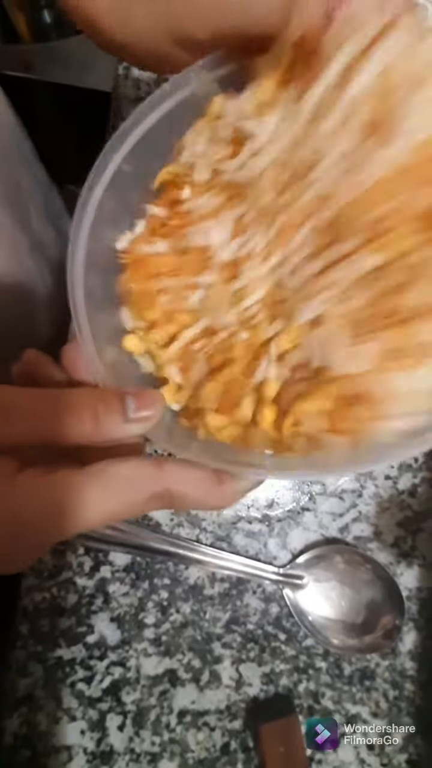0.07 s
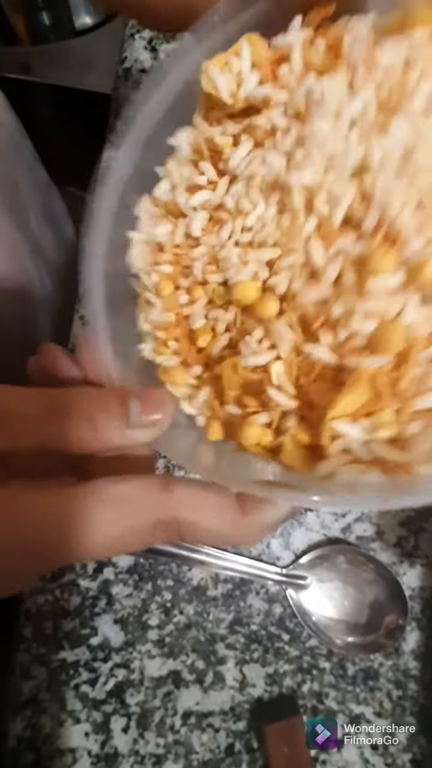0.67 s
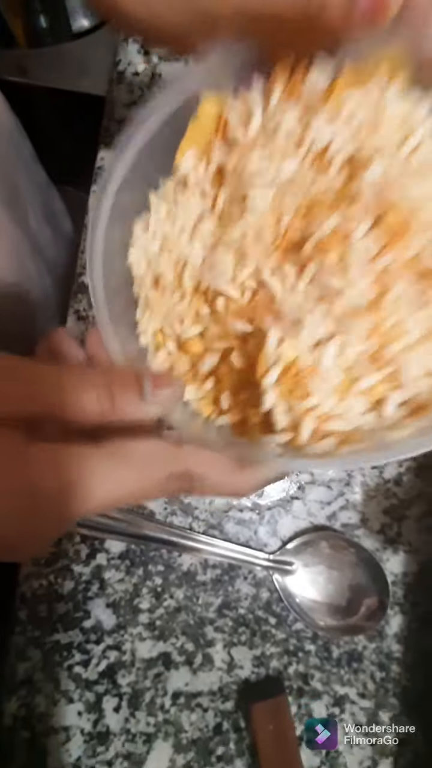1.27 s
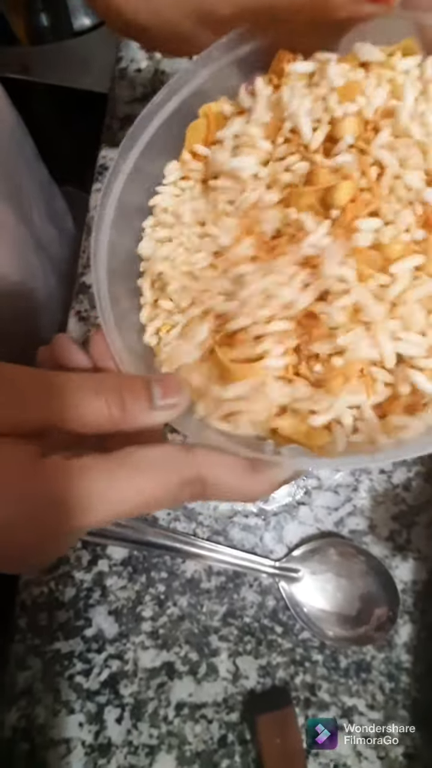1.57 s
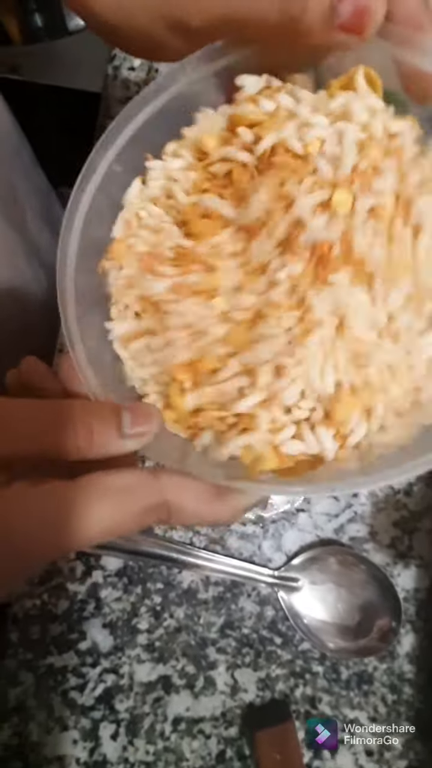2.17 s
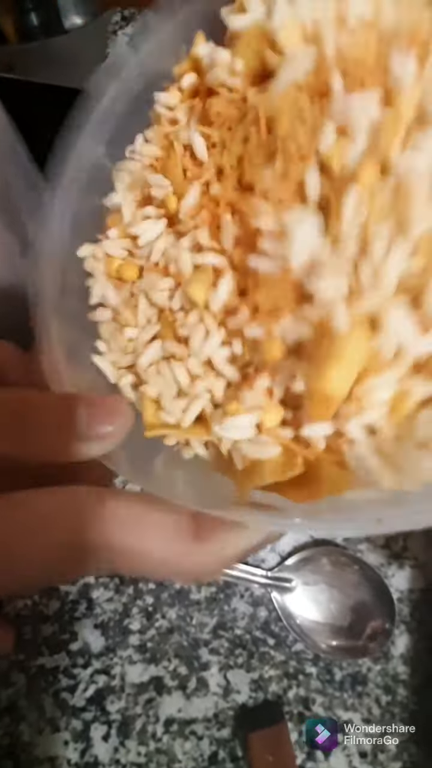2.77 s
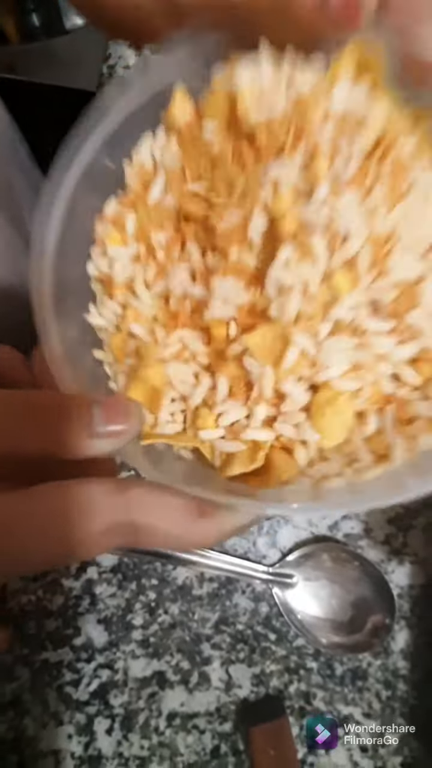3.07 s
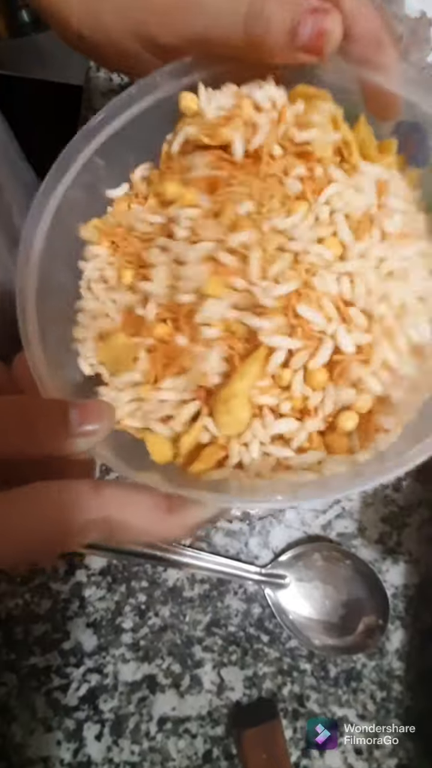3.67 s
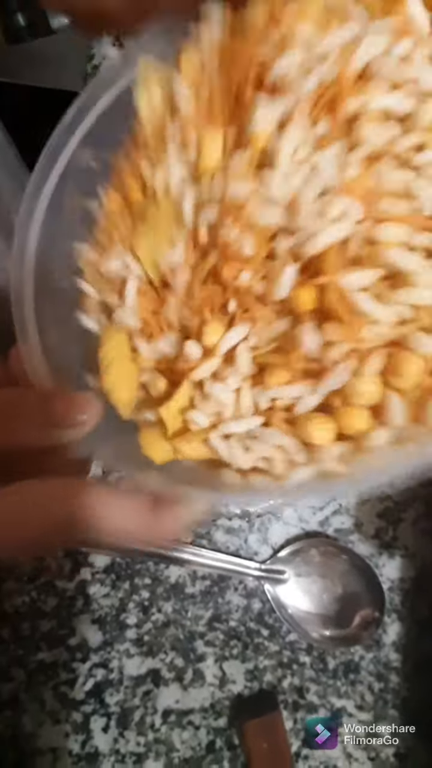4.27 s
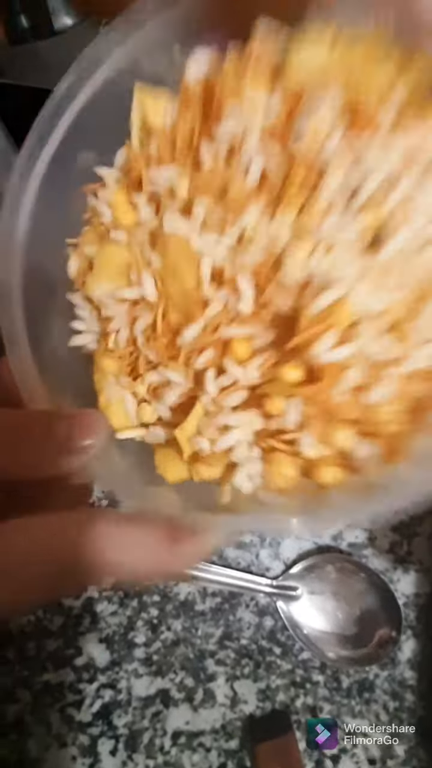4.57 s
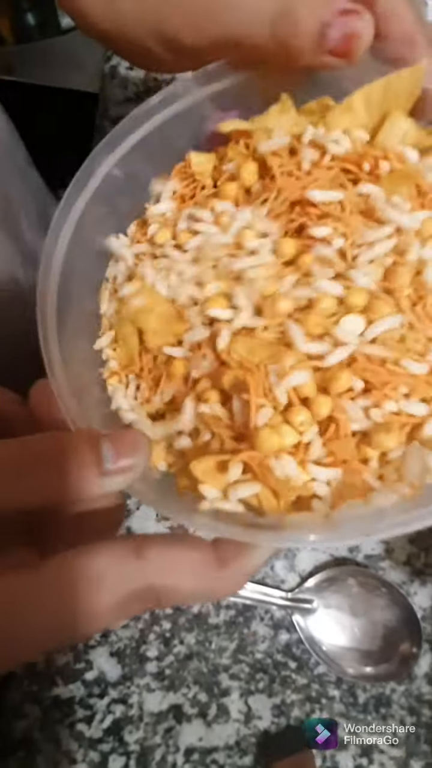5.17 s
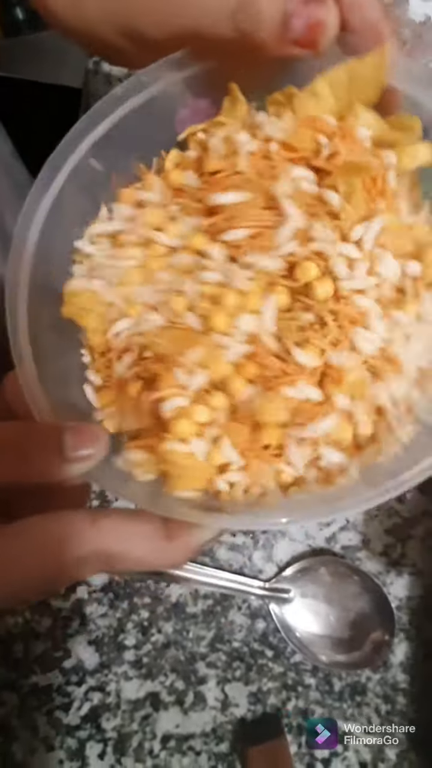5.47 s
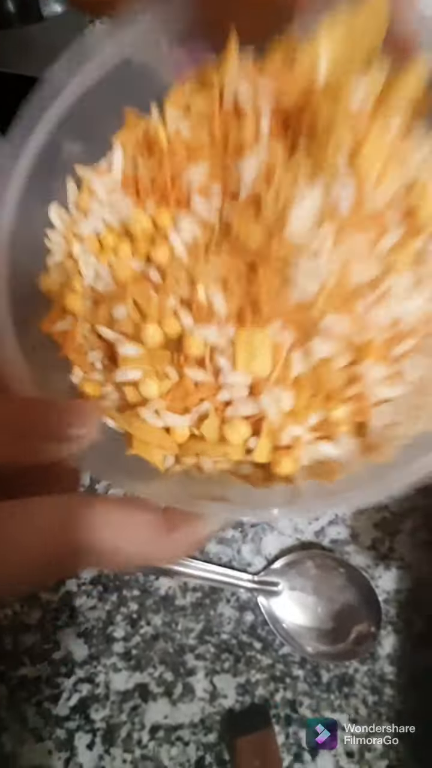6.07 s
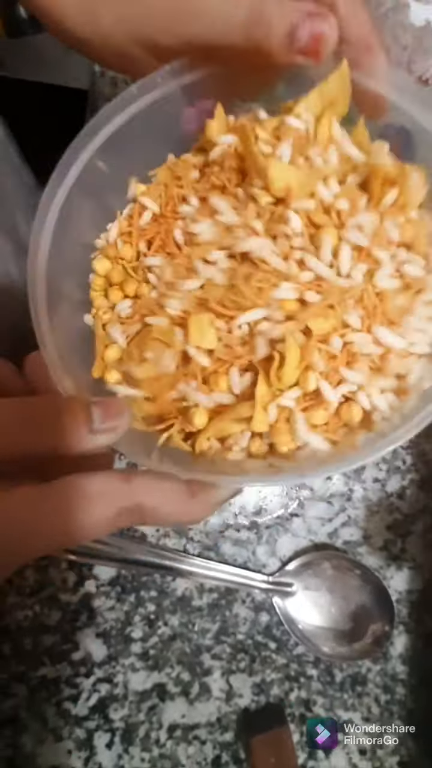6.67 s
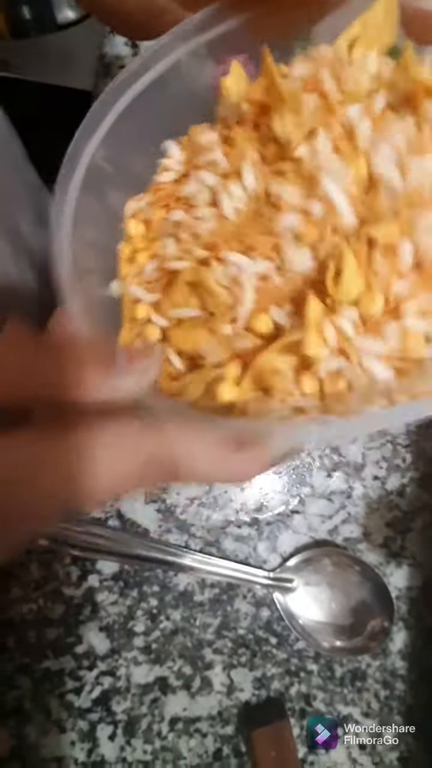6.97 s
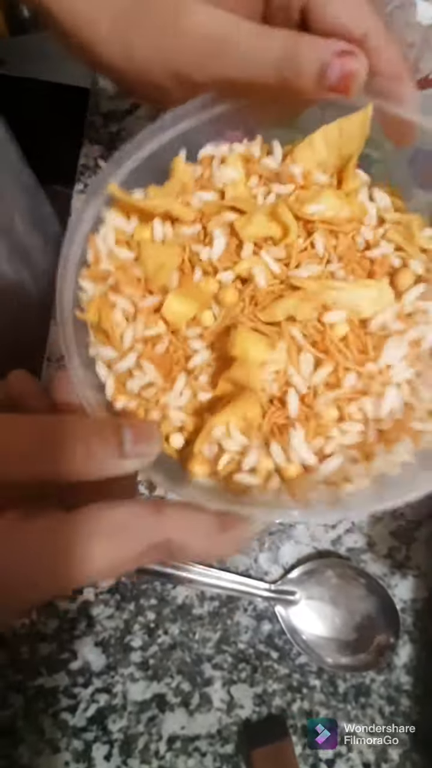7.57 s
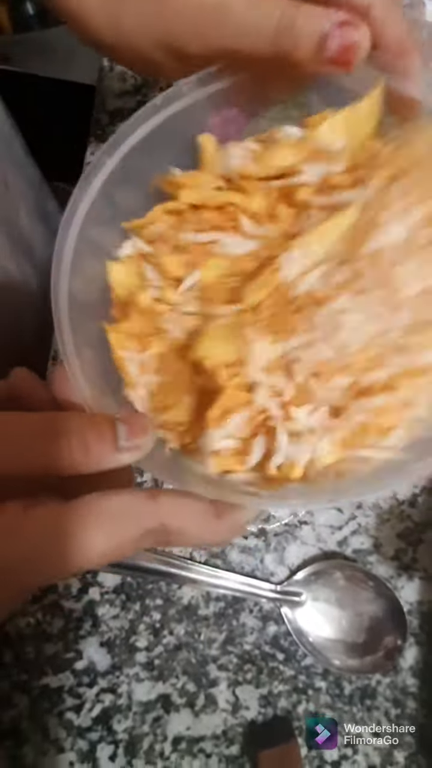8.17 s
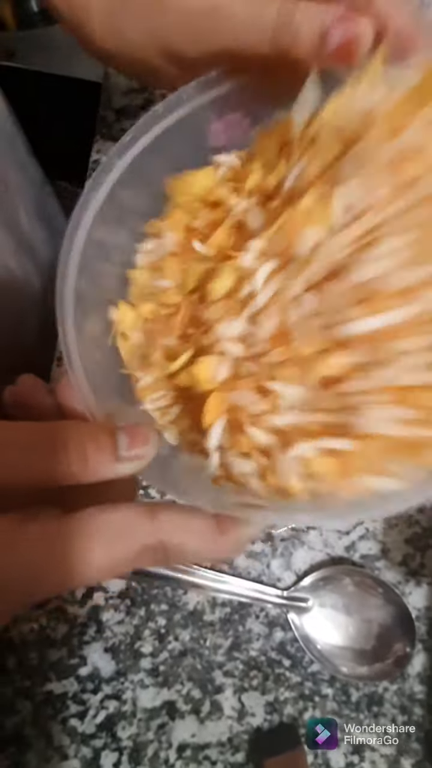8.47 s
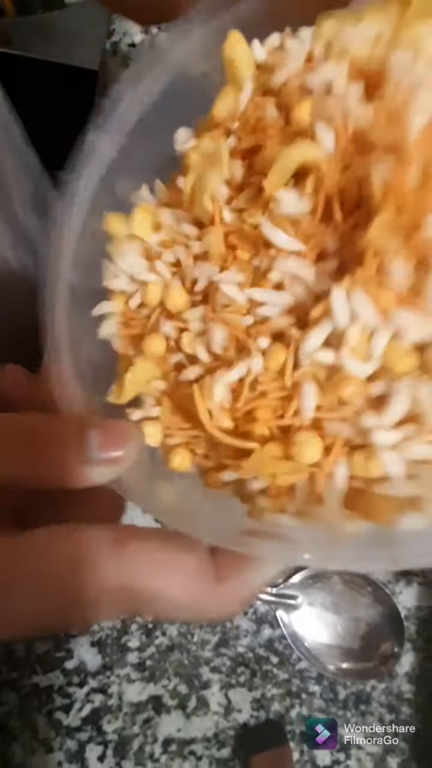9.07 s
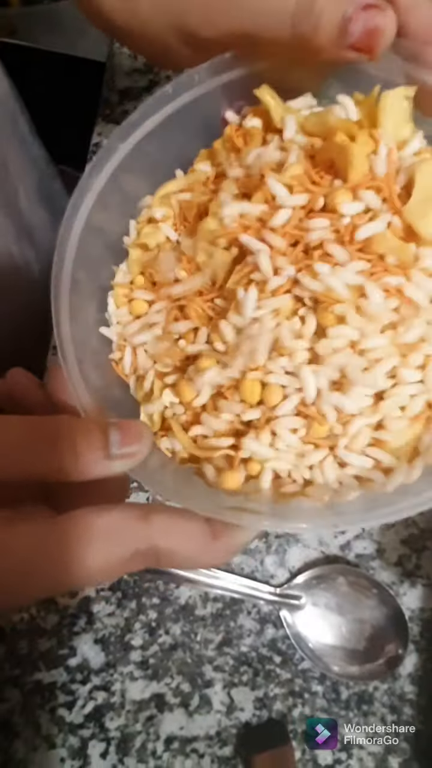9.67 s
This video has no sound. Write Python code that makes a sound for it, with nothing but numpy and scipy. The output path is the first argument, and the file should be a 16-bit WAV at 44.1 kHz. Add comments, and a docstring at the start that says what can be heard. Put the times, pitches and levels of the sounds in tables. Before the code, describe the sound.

From the start, dry puffed rice and crunchy snack bits are tossed in a thin plastic tub close to the microphone, about three times a second. Each load slaps the bottom and patters down in a short, crisp swish, giving the tub a hollow ring that varies in strength. Between tosses the grains slide and settle with a softer rustle, and hard bits tick sharply against the wall. This even rhythm lasts until about 6.7 seconds. From 7 to 7.6 seconds the mix is shaken sideways in quicker strokes, dragging over the bottom with a brighter rattle and a cluster of louder clicks. At about 7.8 seconds the regular tossing resumes, with six more landings, the last near 9.6 seconds. The small kitchen adds only a very short echo, and a faint low hum swells and sinks underneath throughout.

```python
"""Puffed rice and crunchy snack bits are tossed in a thin plastic tub, about three times a second.
Each load slaps the tub's floor, patters down and makes it ring; the grains then slide and settle,
and hard bits tick on the wall. At 7 s the mix is shaken sideways and drags over the floor;
from 7.8 s the tossing resumes. A low hum fills the small kitchen throughout."""
import sys
import numpy as np
from scipy import signal
from scipy.fft import rfft, irfft, next_fast_len
from scipy.io import wavfile

SR = 44100
rng = np.random.default_rng(int(sys.argv[2]) if len(sys.argv) > 2 else 0)


def unload_audio(sound):
    """Save the sound as a 16-bit wav file, at the path given as the first command line argument."""
    columns = np.transpose(np.atleast_2d(sound))
    # keep every value between -1 and 1, then stretch to whole-number steps
    steps = np.round(np.clip(columns, -1, 1) * 32767)
    wavfile.write(sys.argv[1], SR, steps.astype(np.int16))


N = 433062

# Landings; table levels are relative. (slap time [s], slap level [dB], crest time [s], crest level [dB],
# slide lead before crest [s], settling level [dB], boom level [dB], boom pitch [Hz])
LANDINGS = [(.085, -33.5, .158, -26, 0.072, -46.5, -23, 320),
            (.471, -30.5, .509, -25.5, 0.025, -49.5, -46, 272),
            (.812, -29, .845, -25.5, .042, -50.5, -37, 324),
            (1.145, -37, 1.199, -25, 0.041, -50, -30, 324.4), (1.466, -40, 1.523, -26, .04, -49, -32, 324),
            (1.838, -26.5, 1.887, -27.5, 0.057, -58.5, -29.5, 316),
            (2.172, -31.5, 2.215, -24, 0.038, -48, -41, 279),
            (2.556, -26, 2.581, -24, 0.052, -53.5, -38, 320),
            (2.912, -38, 2.957, -25, 0.051, -55.5, -41, 319),
            (3.268, -41, 3.313, -26.5, 0.055, -58, -49, 274),
            (3.663, -27, 3.697, -27, 0.057, -47.5, -40, 322),
            (4.004, -44, 4.048, -25.5, 0.065, -52.5, -28.5, 323),
            (4.362, -42, 4.414, -27.5, 0.071, -49, -35, 332),
            (4.735, -38, 4.790, -28, 0.059, -52.5, -41, 348),
            (5.075, -37, 5.126, -27.5, 0.041, -51, -38, 327),
            (5.439, -38, 5.494, -27.5, 0.05, -43.5, -33.5, 269),
            (5.799, -41, 5.867, -25.5, 0.072, -46, -44, 269),
            (6.246, -33, 6.298, -27.5, 0.041, -59, -39, 274),
            (6.603, -30.5, 6.661, -27.5, 0.055, -51, -40, 312),
            (7.833, -35, 7.890, -25, 0.073, -51, -30.5, 274),
            (8.177, -30, 8.223, -26, 0.054, -46, -30, 300),
            (8.514, -28, 8.554, -27, 0.051, -45.5, -30, 324),
            (8.856, -26, 8.894, -26.5, .05, -45.5, -63, 320),
            (9.205, -23.5, 9.239, -25.5, 0.053, -46, -38, 304),
            (9.563, -45, 9.612, -27, 0.039, -50.5, -28, 328.5)]
# Spectrum of the load hitting the floor: (frequency [Hz], left [dB], right [dB])
IMPACT_SPECTRUM = [(110, -21, -28), (195, -13.5, -23.5), (295, -7.5, -9.5), (438, -12, -21),
                   (657, -4.5, -17), (890, -6.5, -10), (1170, -5.5, -10), (3230, -3.5, -4.5),
                   (4700, -11.5, -13.5), (6800, -12.5, -17), (7980, -26, -16.5), (9140, -28, -28.5),
                   (12000, -22.5, -25.5), (15300, -27.5, -33.5)]
# Spectrum of dry grains rubbing: (frequency [Hz], left [dB], right [dB])
RUSTLE_SPECTRUM = [(200, -14, -18), (400, -14.5, -15.5), (846, -6, -10.5), (1170, -13, -12),
                   (1670, -11, -7.5), (2400, -3.5, -3.5), (3180, 1, -0.5), (4450, -4.5, -7),
                   (6600, -6, -12), (6700, -4.5, -8.5), (8080, -33, -11.5), (9100, -23, -27),
                   (11900, -19, -21.5), (15300, -20.5, -28.5)]
# Tub resonances: (frequency [Hz], width [Hz], level [dB])
TUB_MODES = [(274, 15, 1.5), (324, 13, 7.5), (560, 52, 4), (805, 67, 11), (907, 28, 6), (947, 51, 5),
             (1238, 52, 2.5), (1410, 43, 3.5), (1497, 23, 4), (2200, 110, 1), (3020, 43, -15.5)]


def landings():
    """Each load rains down in a swell of collisions; the floor joins in as the first grains reach it."""
    usual_crest_db, usual_lead_s, fall_db_per_s = -26, 0.053, 315
    floor_force, heap_force, crunch_force = np.zeros((3, N))
    for slap_s, _, crest_s, crest_db, lead_s, *_ in LANDINGS:
        crest = int(crest_s * SR)
        near = np.arange(max(0, crest - SR // 5), min(N, crest + SR // 4))
        t = near / SR
        rise_db_per_s = 392 * (usual_lead_s / lead_s) ** 0.48  # longer slide, slower swell
        slope_db_per_s = np.where(t < crest_s, rise_db_per_s, fall_db_per_s)
        dip_db = np.hypot(slope_db_per_s * (t - crest_s), 3) - 3
        swell = amp(crest_db - dip_db)
        heap_force[near] += swell * amp(np.interp(t, [slap_s - .006, slap_s + .002], [-4, 0]))
        floor_db = np.interp(t, [slap_s - .002, slap_s + .0011, crest_s, crest_s + .052], [-9, 3, 1, -3.5])
        floor_force[near] += swell * amp(floor_db)
        # crunch gathers more tightly around the crest
        crunch_force[near] += amp(-13.5 + 0.75 * (crest_db - usual_crest_db) - 1.26 * dip_db)
    clicks = collisions(9000, spread_db=4.5, scatter_db=-4.5, scatter_t60_s=0.0048)
    patter = coloured(clicks, IMPACT_SPECTRUM, TUB_MODES)
    hollow = filtered(patter, lambda hz: 1 / (1 + (hz / 1100) ** 8))
    crunch = filtered(patter, lambda hz: 1 - 1 / (1 + (hz / 2400) ** 6))
    middle = patter - hollow - crunch
    return amp(11.5) * floor_force * hollow + amp(10) * heap_force * middle + crunch_force * crunch


def knocks():
    """The first clump slaps the floor's modes; the load then booms at a pitch set by grip and filling."""
    t = np.arange(SR // 3) / SR
    early = t[:SR // 12]
    slaps, booms = np.zeros((2, N + len(t)))
    for slap_s, slap_db, crest_s, *_, boom_db, boom_hz in LANDINGS:
        ring = sum(amp(db + 2 * rng.standard_normal()) * np.sin(2 * np.pi * hz * early)
                   for hz, _, db in TUB_MODES[2:9])
        ring *= decay(early, t60_s=0.087) * (1 - np.exp(-early / 0.0014))
        crack = rng.standard_normal(len(early)) * decay(early, t60_s=0.019)
        slaps[round(slap_s * SR):][:len(early)] += amp(slap_db - 8) * (ring + 0.37 * crack)
        # fresh blows keep jolting the boom's phase
        jolts_rad = np.cumsum(rng.standard_normal(len(t))) * np.sqrt(25 / SR)
        push = (1 - np.exp(-(t / 0.019) ** 2)) * decay(t, t60_s=0.31)
        boom = push * np.sin(2 * np.pi * boom_hz * t + jolts_rad)
        booms[round((crest_s - .04) * SR):][:len(t)] += amp(boom_db + 6.5) * boom
    return slaps[:N] * amp([[3], [-4]]) + booms[:N] * amp([[1], [-1]])


def sliding():
    """Faster sliding brings more and brighter collisions; the heap clatters and lone grains bounce off."""
    # Resonances of the stiff wall: (frequency [Hz], width [Hz], level [dB])
    wall_modes = [(324, 29, 10), (783, 40, 3.5), (3033, 185, 3), (3470, 100, -9), (3790, 260, 2.5)]
    # Spectrum of a lone grain's click: (frequency [Hz], left [dB], right [dB])
    stray_spectrum = [(500, -26, -23), (2200, -12, -8), (3200, -4, -3), (6000, 0.5, -8), (8500, -20, -20),
                      (12000, -19, -21)]
    motion_db = heap_motion_db()
    knots = np.arange(N) * 45 / SR  # 45 random levels a second
    clatter_db = 2.1 * np.interp(knots, np.arange(N), rng.standard_normal(N))
    rate_per_s = 3900 * amp(.65 * (motion_db + 38))
    clicks = collisions(rate_per_s, spread_db=4.5, scatter_db=-3, scatter_t60_s=0.012)
    grains = coloured(clicks, RUSTLE_SPECTRUM, wall_modes)
    # slow grains touch softly and lose treble
    treble = filtered(grains, lambda hz: 1 - 1 / (1 + (hz / 6500) ** 4))
    treble_db = np.clip(.3 * (motion_db + 53), -9, 0)
    rustle = grains + (amp(treble_db) - 1) * treble
    bounces = collisions(28, spread_db=4, scatter_db=2, scatter_t60_s=0.0057, spots=3)
    strays = coloured(bounces, stray_spectrum, wall_modes)
    stray_gain = amp(-49.5 + 0.28 * (motion_db + 41))
    stray_gain /= 1 + amp(-53.5 - motion_db) ** 2  # no bounces off a still heap
    return amp(motion_db + clatter_db + 3.5) * rustle + stray_gain * strays


def heap_motion_db():
    """Level of the moving grains: a slide per landing, settling, slips, a hush while the load flies."""
    # Part of the heap slipping, by itself or shaken: (time [s], level [dB])
    slips = [(.35, -41.5), (.40, -35), (.93, -32.5), (1.673, -33.5), (2.11, -41), (2.78, -50),
             (4.15, -38.5), (4.91, -43), (5.28, -41), (5.6, -35.5), (6.08, -52), (6.44, -45), (6.965, -51),
             (7.027, -37.5), (7.161, -24), (7.253, -25.5), (7.342, -24), (7.46, -26), (7.53, -30.5),
             (7.583, -33), (8.37, -52), (8.755, -42.5), (8.992, -31.5)]
    rise_db_per_s, settle_db_per_s = 483, 74.5
    flight_lead_s, flight_half_s = 0.071, 0.039
    t = np.arange(N) / SR
    slide_power, loose_power, hush_db = np.zeros((3, N))
    for _, _, crest_s, _, lead_s, settle_db, *_ in LANDINGS:
        slide = amp(-32) * envelope(crest_s - lead_s, crest_s + 0.049, rise_db_per_s, 219.5)
        slide_power += slide ** 2
        settling = envelope(crest_s, crest_s, rise_db_per_s, settle_db_per_s)
        settling *= amp(settle_db + 0.19 * settle_db_per_s)  # passes settle_db 0.19 s after the crest
        settling *= envelope(crest_s, crest_s + 0.25, 0, 250)  # last grains come to rest
        loose_power += settling ** 2
        flight_s = crest_s - lead_s - flight_lead_s
        hush_db += 2 * np.maximum(1 - ((t - flight_s) / flight_half_s) ** 2, 0)
    for slip_s, db in slips:
        loose_power += (amp(db) * envelope(slip_s, slip_s, 395, 169)) ** 2
    return 10 * np.log10(slide_power + loose_power * amp(-hush_db) ** 2)


def ticks():
    """A hard bit gives a snap and a brief ring, then the tub's walls scatter it."""
    # Hard bits hitting the wall: (time [s], level [dB], pitch [Hz])
    wall_hits = [(0.3978, -24, 2870), (0.5724, -17.5, 3100), (.71, -31, 4230), (.9263, -21, 3460),
                 (1.6841, -21, 3140), (2.147, -32, 3020), (2.4765, -27, 3160), (2.5277, -19, 3620),
                 (3.9409, -24.5, 3370), (5.0165, -24, 4900), (5.2766, -25, 2980), (5.5928, -15.5, 3260),
                 (6.0637, -19.5, 3100), (6.445, -24.5, 3900), (6.537, -16.5, 3060), (6.8808, -31, 3150),
                 (7.1551, -16, 2940), (7.1907, -18.5, 2870), (7.3246, -19, 3070), (7.3515, -12, 3140),
                 (7.4634, -11, 3340), (7.5284, -18.5, 3220), (7.9811, -18, 3180), (8.104, -31, 2800),
                 (8.666, -25, 3310), (8.99, -18, 3130), (9.1531, -30, 5000), (9.33, -24, 3260),
                 (9.4869, -25, 3250)]
    t = np.arange(SR // 40) / SR
    contact = 1 - np.exp(-t / 0.00031)
    out = np.zeros((2, N + len(t)))
    for hit_s, db, hz in wall_hits:
        ring = np.sin(2 * np.pi * hz * t) * decay(t, t60_s=0.0061)
        snap = np.sin(2 * np.pi * rng.uniform(3300, 5750) * t) * decay(t, t60_s=0.0049)
        crack = rng.standard_normal((2, len(t))) * decay(t, t60_s=0.0052)
        scatter = rng.standard_normal((2, len(t))) * decay(t, t60_s=0.068)
        tick = contact * (0.67 * ring + 0.64 * snap + 0.83 * crack + 0.23 * scatter)
        out[:, round(hit_s * SR):][:, :len(t)] += amp(db + 1.5) * tick
    return coloured(out[:, :N], RUSTLE_SPECTRUM)


def drags():
    """Grains dragged over the floor wake its hollow ring without a blow."""
    # Drags of the heap: (start [s], length [s], level [dB])
    strokes = [(6.993, 0.14, -37), (7.207, 0.051, -32.5), (7.41, 0.075, -30.5), (7.528, 0.067, -33),
               (8.308, 0.14, -37), (8.96, .08, -54)]
    t = np.arange(N) / SR
    force = np.zeros(N)
    for start_s, length_s, db in strokes:
        progress = np.clip((t - start_s) / length_s, 0, 1)
        force += amp(db) * np.sqrt(np.abs(np.sin(np.pi * progress)))
    clicks = collisions(5500, spread_db=8.5, scatter_db=4, scatter_t60_s=.008, spots=1)
    return force * coloured(clicks, IMPACT_SPECTRUM, TUB_MODES)


def collisions(rate_per_s, spread_db, scatter_db, scatter_t60_s, spots=5):
    """Stereo grain clicks of rms near 1, from spots in the tub."""
    chance = np.clip(rate_per_s / SR, 1e-6, 1) * np.ones(N)
    hits = np.flatnonzero(rng.random(N) < chance)
    sizes_db = spread_db * np.clip(rng.standard_normal(N)[hits], -2, 2)
    sizes = unit(amp(sizes_db)) / np.sqrt(chance[hits])
    sizes *= rng.choice([-1, 1], N)[hits]
    # the path to the left channel is longer, by where the grain hits
    lag_samples = rng.choice([3, 6, 7, 7, 8, 8, 10, 16, 38, 42], N)[hits]

    def arrivals(pick):
        return np.array([np.bincount(at[pick], sizes[pick], N)[:N] for at in (hits + lag_samples, hits)])

    out = arrivals(hits >= 0)
    t = np.arange(SR // 80) / SR
    for spot in range(spots):
        # wall scatter, much alike in both channels
        paths = rng.standard_normal(len(t)) + 0.56 * rng.standard_normal((2, len(t)))
        paths *= decay(t, scatter_t60_s)
        paths *= amp(scatter_db) / np.linalg.norm(paths, axis=1, keepdims=True)
        direct = arrivals(hits % spots == spot)
        out += signal.oaconvolve(np.float32(direct), np.float32(paths), axes=1)[:, :N]
    return out / np.hypot(1, amp(scatter_db))


def kitchen(x):
    """A short tail from the counter and the walls."""
    # Room decay: (frequency [Hz], T60 [s])
    decay_times = [(200, 0.15), (1000, 0.26), (4000, 0.2), (14000, 0.42)]
    hz, t, noise = signal.stft(rng.standard_normal((2, SR // 2)), SR, nperseg=256)
    tail = signal.istft(noise * decay(t, along(decay_times, hz)[:, None]), SR, nperseg=256)[1]
    tail = np.pad(tail, ((0, 0), (SR // 200, 0)))  # 5 ms delay
    return signal.fftconvolve(x, tail / np.linalg.norm(tail[0]), axes=1)[:, :N]


def background():
    """A low hum that swells and sinks, alike in both channels, and faint room air."""
    # Hum loudness: (time [s], level [dB])
    hum_levels = [(0, -55), (.66, -42), (1.09, -49.5), (1.37, -42), (1.53, -51), (2.2, -46), (2.5, -55),
                  (3.03, -57.5), (3.44, -49), (3.8, -50), (4.85, -55), (6.15, -56), (6.62, -40), (7.2, -54),
                  (7.99, -39.5), (8.35, -52), (9.33, -41.5), (9.82, -49)]
    # Hum spectrum: (frequency [Hz], level [dB])
    hum_spectrum = [(22, -32), (35, -3), (46, -9), (58, -4), (67, 1), (73, 6.5), (82, -19), (120, -10),
                    (170, -30.5), (400, -52.5)]
    # Room air spectrum: (frequency [Hz], level [dB])
    air_spectrum = [(60, 8), (130, -2.5), (220, -1), (330, 2), (480, -6), (1000, -11.5), (3000, -19),
                    (8000, -30.5), (16000, -50)]
    hum = unit(filtered(rng.standard_normal(N), lambda hz: amp(along(hum_spectrum, hz))))
    hum_db = np.interp(np.arange(N) / SR, *np.transpose(hum_levels))
    air = rng.standard_normal(N) + .5 * rng.standard_normal((2, N))
    air = unit(filtered(air, lambda hz: amp(along(air_spectrum, hz))))
    return hum * amp(hum_db) * amp([[-.7], [.6]]) + amp(-50) * air


def amp(db):
    """Decibels to gain."""
    return 10 ** (np.asarray(db) / 20)


def unit(x):
    """x at rms 1."""
    return x / np.sqrt(np.mean(x ** 2) + 1e-20)


def decay(t, t60_s):
    """Gain falling 60 dB in t60_s."""
    return amp(-60 * t / t60_s)


def envelope(start_s, end_s, rise_db_per_s, fall_db_per_s):
    """Gain that rises to 1 at start_s, holds until end_s and falls."""
    t = np.arange(N) / SR
    dip_db = rise_db_per_s * np.maximum(start_s - t, 0) + fall_db_per_s * np.maximum(t - end_s, 0)
    return amp(-np.minimum(dip_db, 200))


def along(points, hz, column=1):
    """A column of a frequency table, read on a log axis."""
    table = np.transpose(points)
    return np.interp(np.log(hz + 1), np.log(table[0] + 1), table[column])


def filtered(x, response):
    """x shaped by a gain function of frequency."""
    size = next_fast_len(N + SR // 2)
    return irfft(rfft(x, size) * response(np.fft.rfftfreq(size, 1 / SR)), size)[..., :N]


def coloured(x, spectrum, modes=(), size=8192):
    """x through causal left and right filters of mean energy 1: a spectrum with resonances on top."""
    hz = np.fft.rfftfreq(size, 1 / SR)
    gain = amp([along(spectrum, hz, column) for column in (1, 2)])
    mode_power = sum(amp(db) ** 2 / (1 + (2 * (hz - mode_hz) / width_hz) ** 2)
                     for mode_hz, width_hz, db in modes)
    gain *= np.sqrt(1 + mode_power)
    gain *= (hz + 1) / np.hypot(hz, 90)  # 90 Hz high-pass
    # fold the cepstrum for minimum phase
    cepstrum = irfft(np.log(gain))
    cepstrum[:, 1:size // 2] *= 2
    cepstrum[:, size // 2 + 1:] = 0
    kernel = irfft(np.exp(rfft(cepstrum)))
    return signal.oaconvolve(x, kernel / np.sqrt(np.sum(kernel ** 2) / 2), axes=1)[:, :N]


def scene():
    """The tub close by, in its room."""
    tub = landings() + knocks() + sliding() + drags() + ticks()
    return amp([[-.4], [-.2]]) * (tub + amp(-12) * kitchen(tub)) + background()


def record(dry):
    """The microphone rounds off the highest peaks and cuts the deepest bass and the top treble."""
    ceiling, low_hz, top_hz = .9, 36, 16100
    rounded = dry / (1 + np.abs(dry / ceiling) ** 4) ** (1 / 4)
    return filtered(rounded, lambda hz: (hz < top_hz) * (1 - 1 / (1 + (hz / low_hz) ** 6)))


dry = scene()
out = record(dry)
unload_audio(out)
```